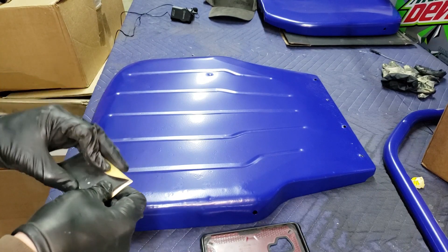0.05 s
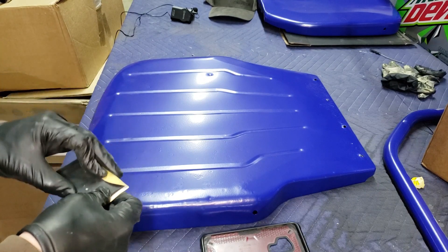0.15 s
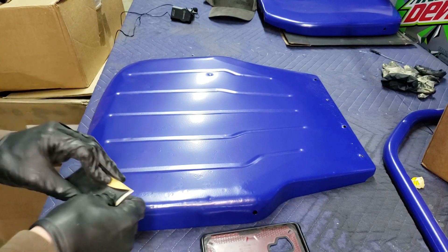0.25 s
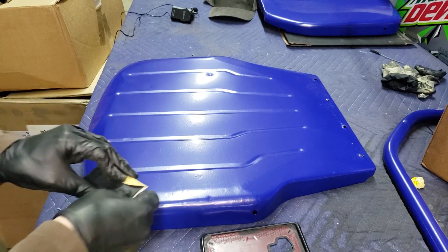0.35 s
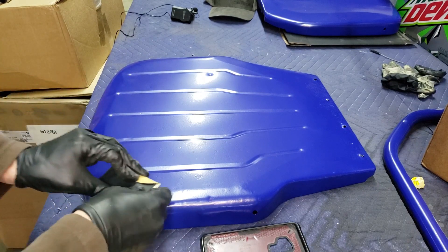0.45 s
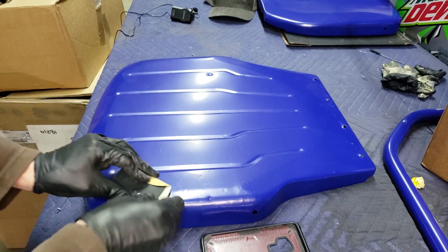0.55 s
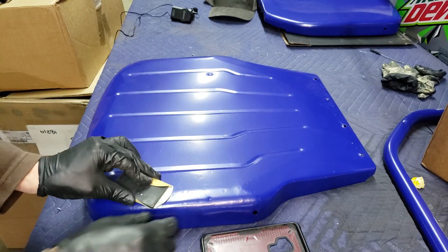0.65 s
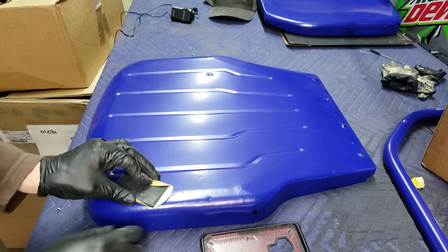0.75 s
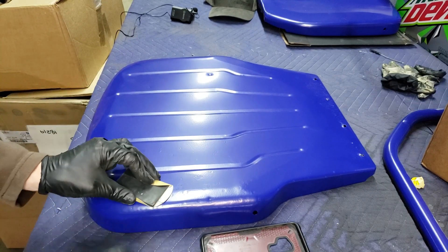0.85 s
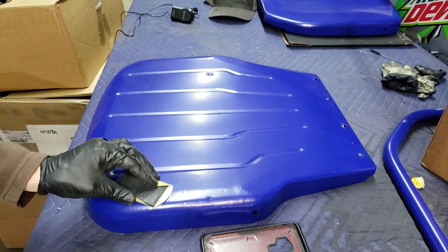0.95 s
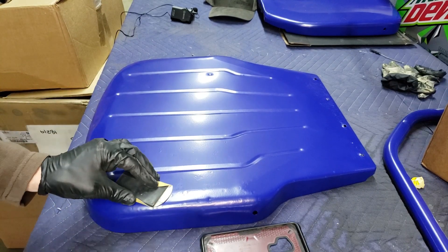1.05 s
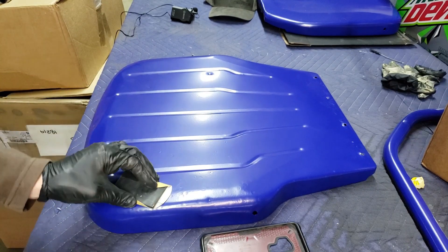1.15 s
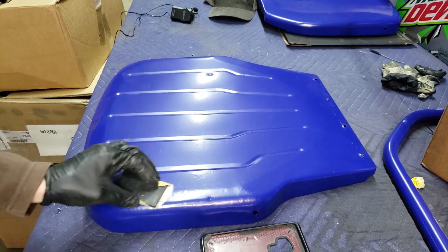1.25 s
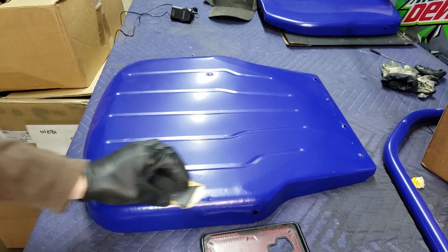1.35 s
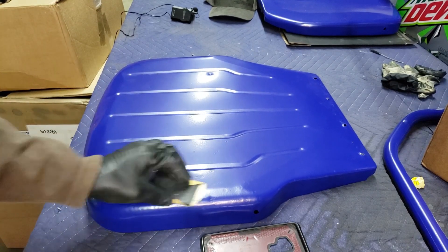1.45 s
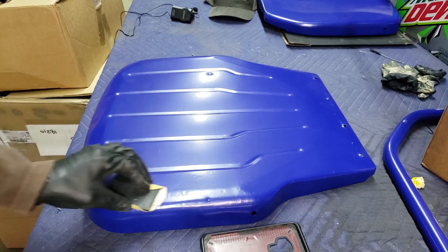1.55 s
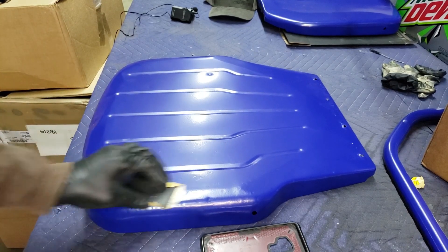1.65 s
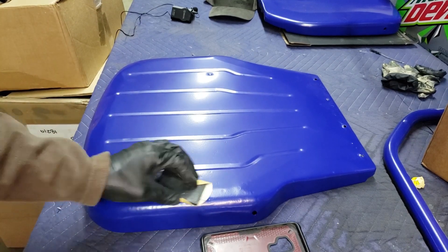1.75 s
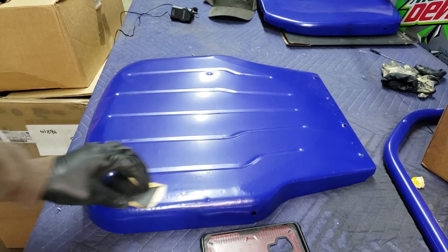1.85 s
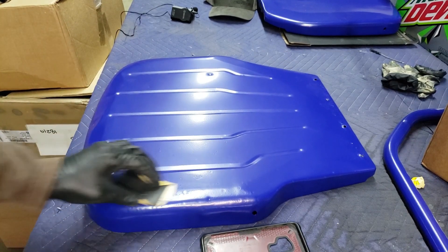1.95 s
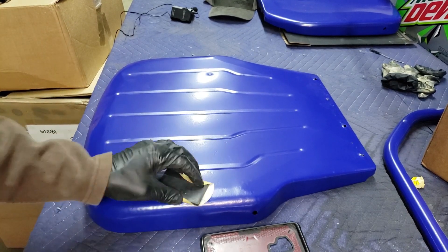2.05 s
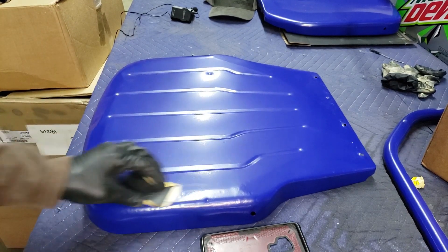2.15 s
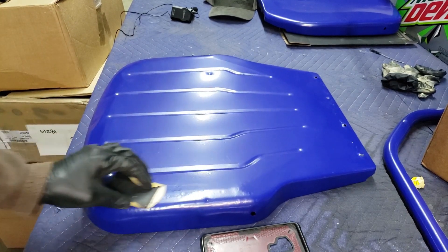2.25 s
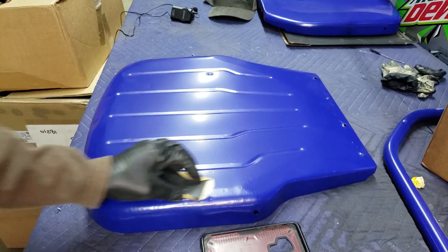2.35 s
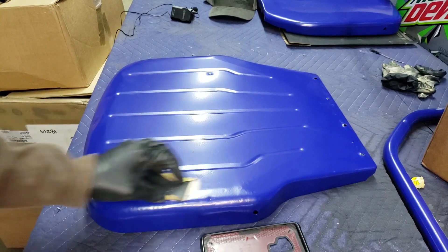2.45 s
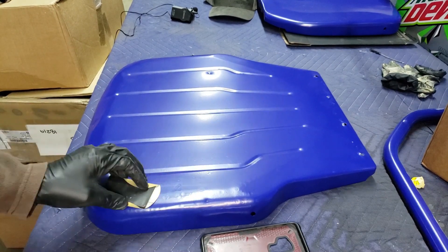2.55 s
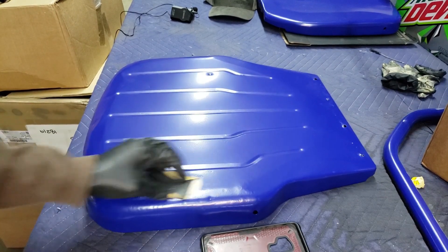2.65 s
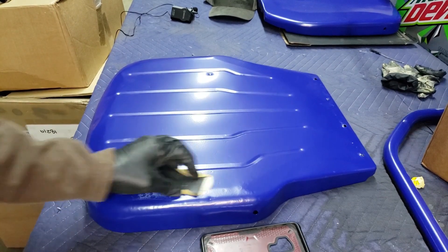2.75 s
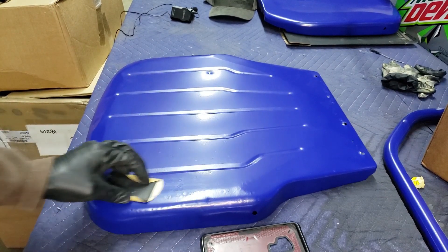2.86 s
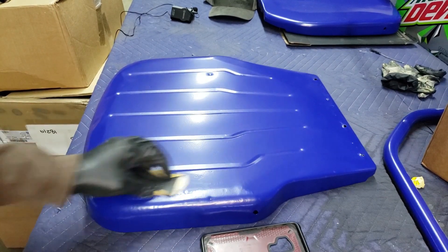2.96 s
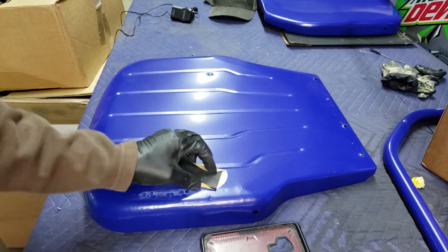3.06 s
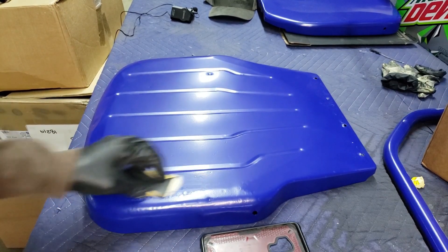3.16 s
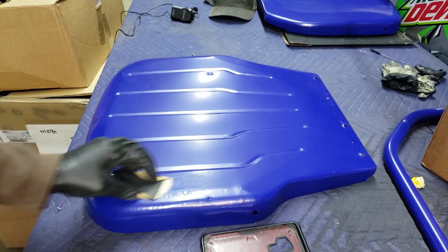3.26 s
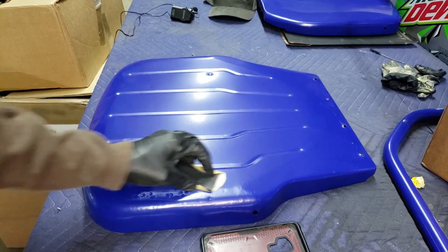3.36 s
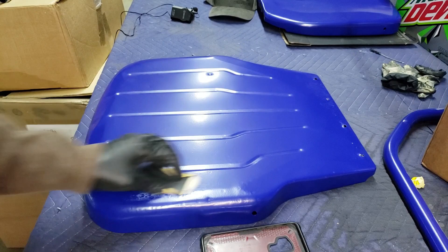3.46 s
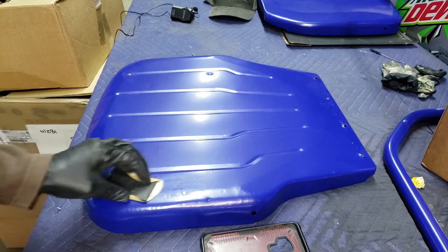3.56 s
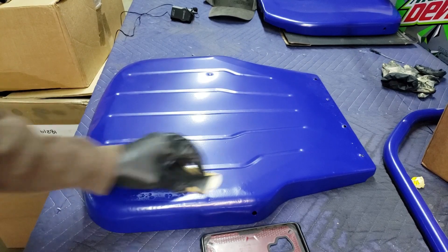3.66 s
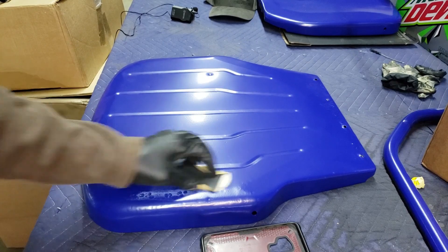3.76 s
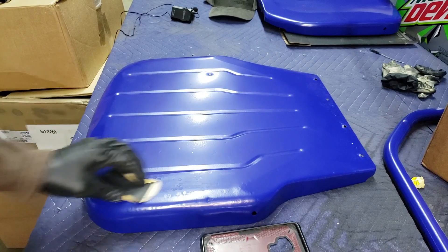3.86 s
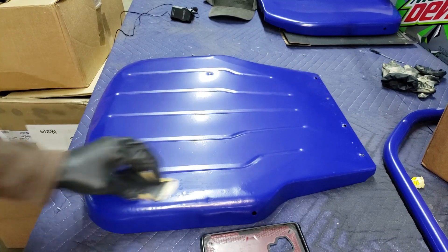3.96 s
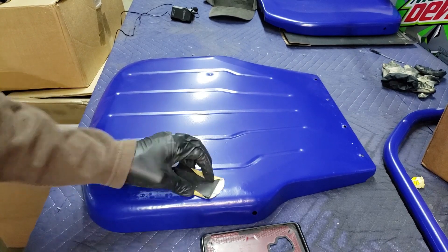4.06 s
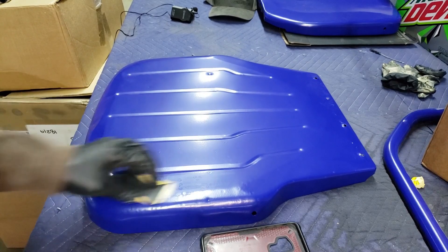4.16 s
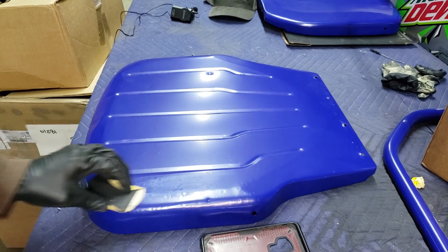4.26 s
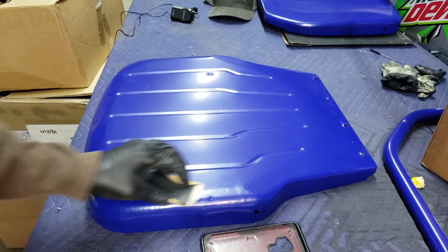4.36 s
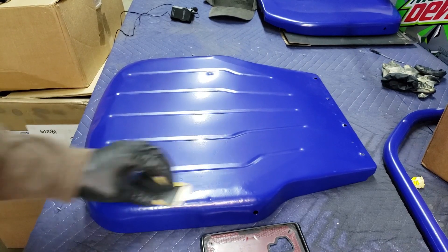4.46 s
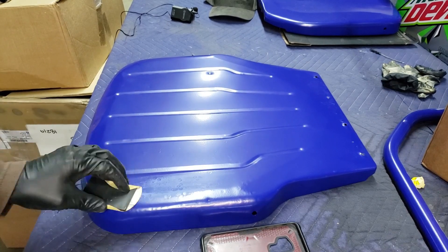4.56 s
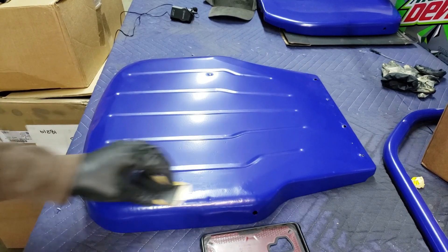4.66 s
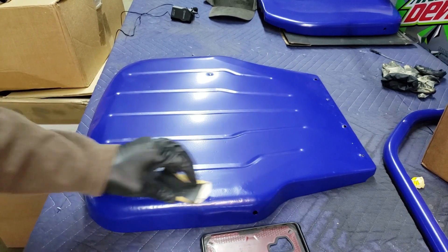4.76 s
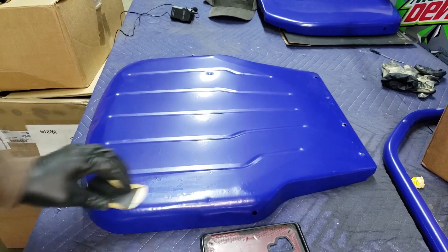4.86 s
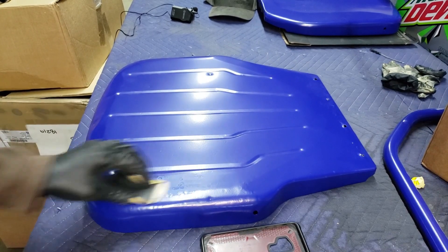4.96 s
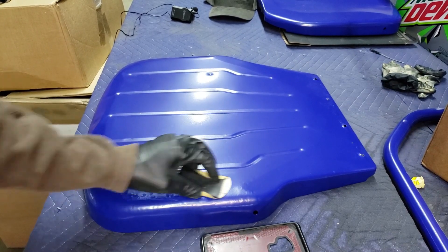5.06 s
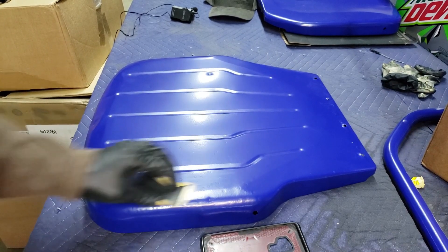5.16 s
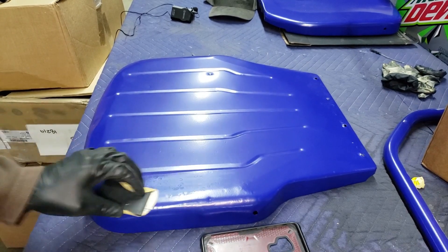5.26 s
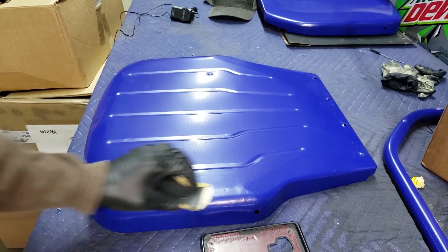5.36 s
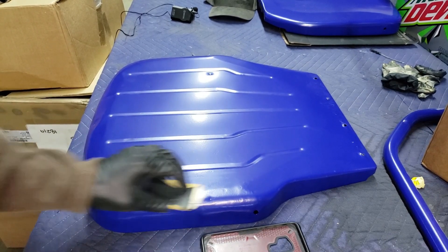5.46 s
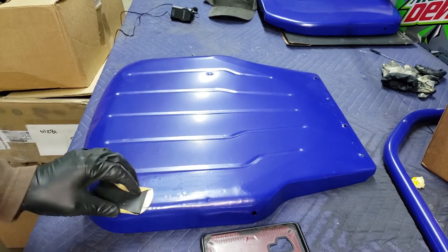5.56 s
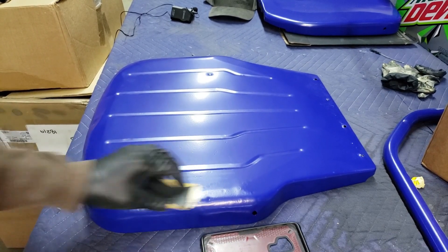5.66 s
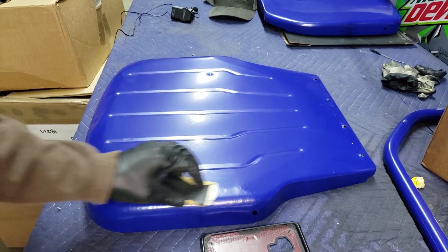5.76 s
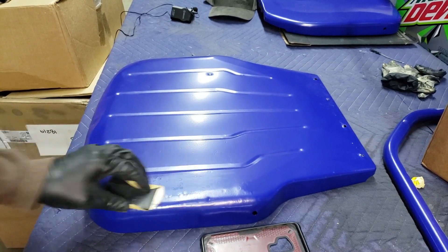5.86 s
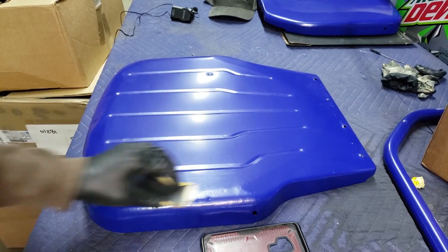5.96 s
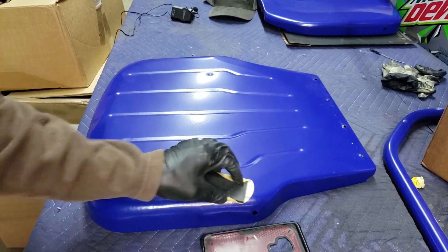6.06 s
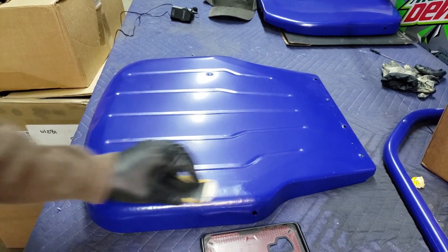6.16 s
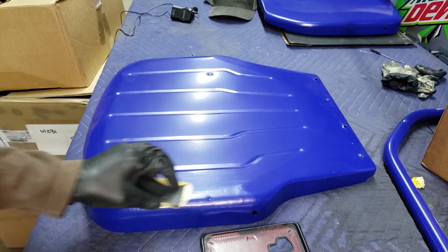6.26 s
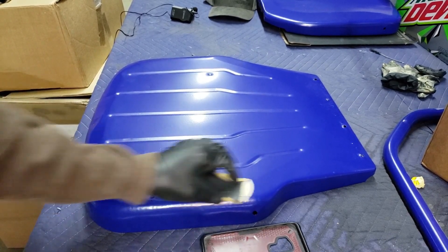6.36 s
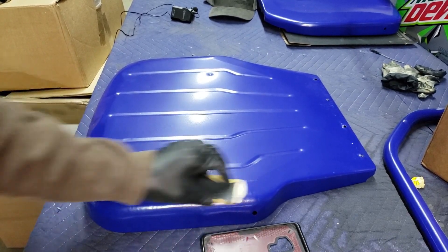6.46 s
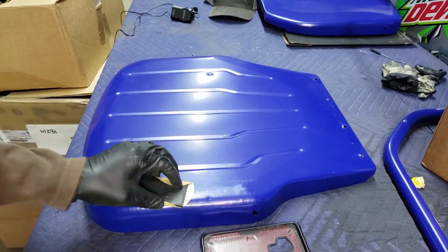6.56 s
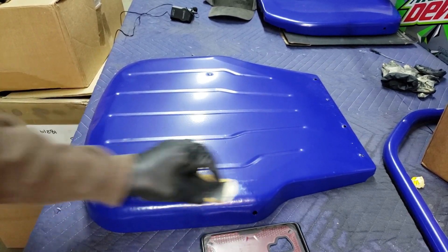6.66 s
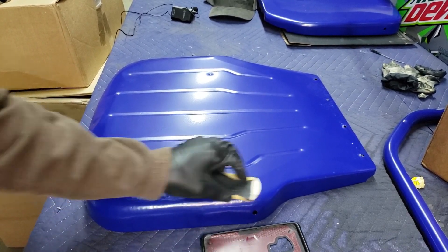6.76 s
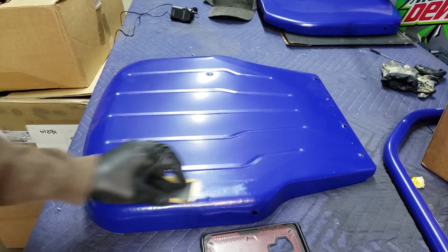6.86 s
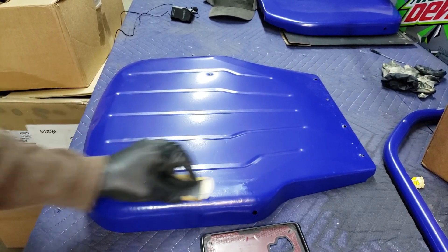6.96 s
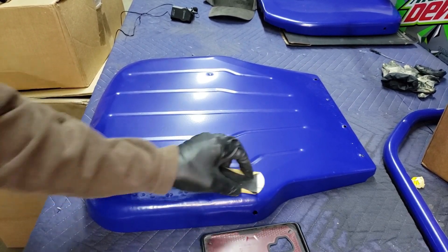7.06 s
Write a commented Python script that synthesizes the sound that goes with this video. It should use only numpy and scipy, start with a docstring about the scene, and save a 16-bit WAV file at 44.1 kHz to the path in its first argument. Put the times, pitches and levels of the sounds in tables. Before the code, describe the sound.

A gloved hand settles a sanding pad on a coated steel panel with soft brushes and a few crackles of stiff paper. Then it sands quickly back and forth in even, hissing, scratchy strokes, the paper sometimes catching with a rasp and the metal ringing faintly. The work sounds close, in a small workshop with a low machine hum. A hollow drone swells in the background near the end.

```python
"""Machinery hums in a small workshop as a gloved hand settles a hard sanding pad on a coated steel panel:
soft brushes, a few crackles of stiff paper. From 1.3 s it rubs to and fro, six strokes a second.
Grit scratches faster as the pad speeds up and falls silent at each turn; the panel rings faintly under it
and on some strokes the paper catches and rasps. From about 5.5 s a hollow drone swells behind the work."""
import sys
import numpy as np
from scipy import signal
from scipy.fft import rfft, irfft, next_fast_len
from scipy.io import wavfile
from scipy.ndimage import uniform_filter1d

SR = 44100
rng = np.random.default_rng(int(sys.argv[2]) if len(sys.argv) > 2 else 0)


def unload_audio(sound):
    """Save the sound as a 16-bit wav file, at the path given as the first command line argument."""
    columns = np.transpose(np.atleast_2d(sound))
    # keep every value between -1 and 1, then stretch to whole-number steps
    steps = np.round(np.clip(columns, -1, 1) * 32767)
    wavfile.write(sys.argv[1], SR, steps.astype(np.int16))


N = 313110
PADDED = next_fast_len(N + SR // 4, True)
TIME, FREQS = np.arange(N) / SR, np.fft.rfftfreq(PADDED, d=1 / SR)


# EQ of grit scraping on steel: f/Hz, left level/dB, right level/dB
SCRAPE_EQ = [(200, -13, -14), (450, -11, -16), (900, -22, -23), (1600, -20, -22), (3000, -13, -14),
             (4000, -12, -13), (6400, -6, -5), (7400, -5, -8), (8400, -13, -22), (10500, -8, -13),
             (11800, -3.7, -7), (13400, -4, -7.5), (14800, -2, -14.5), (15600, 0, -15)]
def sanding(fine_db=3.0, coarse_db=-3.0, crossover_hz=7900):
    """Fine grit hisses on top, coarse grit bites below and rings the panel; both get denser with speed."""
    speed, place, pressure, bite, ringing = hand()
    fine = grit(14000 * (speed + .3), spread_db=2.5, grain_s=.0005)
    fine *= (speed + .33) ** .18 * undb(.8 * walk(60.4)) * pressure
    coarse = grit(7000 * (speed + .3), spread_db=2.4, grain_s=.0007)
    coarse *= (speed + .063) ** .024 * undb(.57 * walk(42.8)) * pressure * bite
    coarse = stereo(coarse, alike_hz=716, lag_s=.00016)
    left_eq = colour([(hz, left) for hz, left, _ in SCRAPE_EQ])
    right_eq = colour([(hz, right) for hz, _, right in SCRAPE_EQ])
    eq = np.array([left_eq, right_eq])
    treble = 1 / (1 + (crossover_hz / (FREQS + 1)) ** 16)
    hiss = undb(fine_db) * shape(fine, unit(eq * np.sqrt(treble)))
    scratch = undb(coarse_db) * shape(paper_flex(coarse), unit(eq * np.sqrt(1 - treble)))
    return close_reflections(hiss + scratch + paper_catches(), place) + panel(coarse * ringing)


# how far the hand drags behind its beat: t/s, lag/s
BEAT_LAG = [(1.32, -0.0029), (1.65, 0.019), (1.82, 0.0015), (2.15, -0.0091), (3.31, -0.014), (3.65, -.022),
            (3.98, -0.0035), (4.31, 0.00072), (4.97, -0.00049), (5.3, 0.016), (5.64, 0.0029),
            (5.97, -0.0021), (6.14, 0.011), (7.1, .012)]
# arm effort, the fader ride on all the grit: t/s, level/dB
ARM_EFFORT = [(1.32, -37.5), (1.7, -33.8), (2.6, -33.6), (3.2, -35.5), (3.75, -35), (4.2, -33), (4.6, -34),
              (5.15, -33), (5.38, -36.5), (5.55, -35), (6.05, -34), (6.55, -35), (7, -33)]
# extra ride on the coarse grit: t/s, level/dB
GRIT_BITE = [(1.32, -4.5), (2.6, -3.5), (3.05, -4.2), (3.45, -2.4), (4.35, -5), (5.1, -5.2), (5.6, -2.6),
             (6.1, -4.8), (7.1, -4.5)]
# send to the panel, which rings less near its stiff rim: t/s, level/dB
PANEL_SEND = [(4.9, -2), (5.9, -11), (7.1, -8)]
def hand(first_s=1.324, stroke_s=.166, break_s=.00073, halt_s=.016):
    """The hand pushes and pulls to an even beat, and the pad sticks briefly at each turn."""
    # pressure rise over the stroke/dB, extra bite/dB, extra ring/dB, rest at the turn/s
    push = (.17, .79, 0, .012)  # holds its pressure and bites harder
    pull = (-2, -.3, -3, .015)  # starts hard and eases off
    beats = np.arange(first_s, TIME[-1] + 2 * stroke_s, stroke_s)
    starts = beats + curve(BEAT_LAG, beats)
    stroke = np.maximum(np.searchsorted(starts, TIME) - 1, 0)
    lean_db, bite_db, ring_db, rest_s = np.array([push, pull])[stroke % 2].T
    since, until = TIME - starts[stroke], starts[stroke + 1] - rest_s - TIME
    swing = np.pi * np.clip(since / (since + until), 0, 1)
    speed, place = np.sin(swing), np.cos(swing) * (-1) ** stroke
    # the grit breaks free abruptly and comes to rest more gently
    sliding = (1 - np.exp(-since.clip(0) / break_s)) * (1 - np.exp(-(until.clip(0) / halt_s) ** 2))
    pressure = sliding * undb(curve(ARM_EFFORT, TIME) - lean_db / 2 * np.cos(swing))
    bite = undb(curve(GRIT_BITE, TIME) + bite_db)
    ringing = undb(curve(PANEL_SEND, TIME) + ring_db)
    return speed, place, pressure, bite, ringing


def grit(rate, spread_db, grain_s):
    """Grains catch and let go, rate times a second: tiny bursts, most weak and a few strong."""
    hits = rng.random(N) < rate / SR
    strength = undb(spread_db * np.minimum(rng.exponential(size=N), 6))
    energy = signal.lfilter([1], [1, -np.exp(-1 / (grain_s * SR))], hits * strength ** 2)
    return unit(noise() * np.sqrt(energy))


def paper_flex(x, depth=.37, rate=7):
    """The paper flexes under the fingers, so narrow bands of its colour come and go."""
    return x + sum(depth * walk(rate) * band(x, hz, hz / 7) for hz in np.geomspace(1800, 7000, 8))


# rasp accents: t/s, level/dB
RASPS = [(1.756, -41), (1.896, -36), (2.197, -37.5), (2.555, -45), (2.85, -42), (4.052, -38), (4.207, -35),
         (4.537, -36.5), (4.867, -34), (5.223, -36.5)]
def paper_catches(hz=6360, width_hz=2200, fade_s=.015):
    """The paper catches and chatters brightly near the middle of some strokes."""
    chatter = grit(1600, spread_db=3.0, grain_s=.00072)
    envelope = sum(undb(db) * swell(s, fade_s, fade_s) for s, db in RASPS)
    return envelope * rasp(chatter, hz, width_hz)


# modes of the steel panel: f/Hz, width/Hz, level/dB
PANEL_MODES = [(232, 25, 7), (1137, 16, -4), (1250, 30, -4), (1462, 45, -5), (1783, 22, 0), (1995, 60, -5),
               (2188, 24, 1), (2318, 18, -3), (3033, 26, 2)]
def panel(drive, patchy_db=3):
    """The steel rings under the grit; each mode swells and fades at random, as if the pad crossed nodes."""
    return sum(band(drive, hz, width) * undb(db + patchy_db * walk(4.6)) for hz, width, db in PANEL_MODES)


def close_reflections(pair, place, gain=.25, sweep_s=.0003):
    """Bounces off hand, panel and bench; their paths change as the pad travels, a light flange."""
    out, index = pair.copy(), np.arange(N)
    for channel, delay_s in [(0, .0016), (0, .0037), (1, .0011), (1, .0046)]:
        out[channel] += gain * np.interp(index - (delay_s + sweep_s * place) * SR, index, pair[channel])
    return out


# settling touches: peak t/s, rise/s, fall/s, rub level/dB, scuff f/Hz, scuff level/dB
TOUCHES = [(.1, 0.032, 0.02, -56, 4730, -62), (.236, 0.0084, 0.011, -55, 2700, -63),
           (.607, 0.032, 0.014, -49, 3430, -59), (.662, 0.0094, 0.013, -45.5, 2480, -59),
           (.77, 0.13, 0.19, -58.5, 1700, -70), (1.055, 0.029, 0.068, -53, 2700, -58.5),
           (1.224, 0.026, 0.04, -49.5, 6000, -63)]
# EQ of the rub: f/Hz, level/dB
RUB_EQ = [(500, 1.5), (1500, -9.5), (3200, -8), (5000, -7), (7200, -5), (8500, -15.5), (12000, -14.5),
          (16000, -10.5)]
def glove_brushes(relative_width=.46):
    """Glove and paper brush over the panel: a broad rub, and a scuff with its own pitch each time."""
    rub = shape(grit(2500, spread_db=2, grain_s=.0008), unit(colour(RUB_EQ)))
    scuff = grit(2300, spread_db=2, grain_s=.00085)
    out = 0
    for s, rise, fall, rub_db, hz, scuff_db in TOUCHES:
        touch = undb(rub_db) * rub + undb(scuff_db) * rasp(scuff, hz, relative_width * hz)
        out += swell(s, rise, fall) * touch
    return out


# snaps of the paper: t/s, level/dB before the trim
SNAPS = [(0.657, -34), (0.7636, -45), (0.7744, -43), (0.789, -43), (0.8127, -34), (0.848, -38),
         (0.8978, -45), (1.005, -34), (1.0127, -34)]
# EQ of a snap: f/Hz, level/dB
SNAP_EQ = [(500, -16), (2500, -12), (5000, -5), (6800, 4.5), (8500, -8), (13000, -4), (16000, -9)]
def paper_crackles(trim_db=-6, decay_s=.0028):
    """The stiff paper crackles as it is gripped: noise bursts with a hard attack and a tight tail."""
    envelope = 0
    for s, db in SNAPS:
        decay = np.exp(-np.minimum(np.abs(TIME - s) / decay_s, 20))
        envelope += undb(db + trim_db) * (TIME >= s) * decay
    return shape(noise() * envelope, unit(colour(SNAP_EQ)))


def room_reverb(x, t60_s=.6):
    """The shop walls return a short, dense, duller tail that differs left and right."""
    t = TIME[:SR // 2]
    tail = rng.standard_normal((2, len(t))) * np.exp(-np.log(1000) * t / t60_s)
    tail /= np.sqrt(np.sum(tail ** 2, axis=1, keepdims=True))
    walls = colour([(300, 4), (2000, 10.5), (6000, 2.5), (10000, -5.5), (16000, -4)])
    return shape(signal.fftconvolve(x, tail, axes=1)[:, :N], walls)


# machine tones: f/Hz, level/dB, waver/dB
HUM_TONES = [(41.5, -58.5, 2.5), (83.2, -52, 1.8), (114.4, -59.5, 2.5), (146.3, -50, -0.27),
             (173.9, -62, 1.5), (226.6, -64, 3)]
def machine_hum(drift_rad_per_db=.63):
    """Machinery hums just right of centre, each tone wavering in level and phase."""
    hum = 0
    for hz, db, waver_db in HUM_TONES:
        amplitude = np.sqrt(2) * undb(db + waver_db * walk(4.2))
        drift = drift_rad_per_db * waver_db * walk(2.3)
        hum += amplitude * np.sin(2 * np.pi * hz * TIME + drift)
    return pan(hum, left_db=-.7)


# EQ of the room tone: f/Hz, level/dB
AIR_EQ = [(15, -47), (25, -34), (59, -3.5), (130, -1.5), (170, -14.5), (200, -11), (335, -9.5),
          (516, -13.5), (624, -19.5), (734, -18), (1040, -22.5), (3250, -36), (6740, -33.5), (8590, -43),
          (16000, -44)]
def shop_air(level_db=-49.5, waver_db=1.16):
    """Moving air lays a gently breathing bed of rumble, a little to the left."""
    air = unit(shape(stereo(noise(), alike_hz=680, lag_s=.00012), colour(AIR_EQ)))
    return pan(air * undb(level_db + waver_db * walk(3.1)), left_db=1.46)


# fade-in of the drone: t/s, level/dB
DRONE_FADE = [(5.1, -100), (5.5, -59), (5.72, -55.5), (5.9, -49.5), (6.2, -47.5), (7.1, -48.5)]
# its hollow resonances: f/Hz, width/Hz, level/dB
DRONE_MODES = [(430, 29, -8), (511, 47, 0), (710, 22, 2), (765, 18, -6), (823, 15, 0), (1010, 130, -16.5)]
def drone():
    """A hollow rush with a few narrow resonances swells in the background."""
    hollow = sum(undb(db) * 1j * FREQS * width / (hz ** 2 - FREQS ** 2 + 1j * FREQS * width)
                 for hz, width, db in DRONE_MODES)
    rush = unit(shape(stereo(noise(), alike_hz=910, lag_s=.00013), hollow))
    return rush * undb(curve(DRONE_FADE, TIME))


def undb(db):
    """Decibels to gain."""
    return 10 ** (np.asarray(db) / 20)


def unit(x):
    """Scale to rms 1."""
    return x / np.sqrt(np.mean(x ** 2))


def noise():
    """Two unrelated white noises."""
    return rng.standard_normal((2, N))


def shape(x, gain):
    """Filter by a gain for every frequency."""
    return irfft(rfft(x, PADDED) * gain, PADDED)[..., :N]


def colour(points):
    """EQ curve through (f/Hz, level/dB) points on a log-frequency axis."""
    hz, db = np.transpose(points)
    return undb(np.interp(np.log(FREQS + 1), np.log(hz), db))


def band(x, hz, width):
    """One resonance, gain 1 at its centre."""
    return signal.lfilter(*signal.iirpeak(hz, hz / width, fs=SR), x)


def rasp(x, hz, width):
    """A resonance with steep skirts, at rms 1."""
    return unit(band(band(x, hz, width), hz, width))


def curve(points, t):
    """Read a (t/s, value) automation curve at times t."""
    return np.interp(t, *np.transpose(points))


def swell(s, rise, fall):
    """A bell-shaped envelope that peaks at time s."""
    return np.exp(-.5 * np.minimum(((TIME - s) / np.where(TIME < s, rise, fall)) ** 2, 40))


def walk(rate):
    """Smooth random modulation at rms 1 that changes about rate times a second."""
    hold = max(int(SR / rate / 2), 1)
    steps = np.repeat(rng.standard_normal(N)[:N // hold + 1], hold)[:N]
    return unit(uniform_filter1d(steps, hold))


def stereo(pair, alike_hz, lag_s):
    """Blend two unrelated signals: near mono in the bass, wide on top, a little later on the right."""
    apart = np.pi / 4 * FREQS / np.hypot(FREQS, alike_hz)
    mid, side = shape(pair[0], np.cos(apart)), shape(pair[1], np.sin(apart))
    return np.array([mid + side, shape(mid - side, np.exp(-2j * np.pi * FREQS * lag_s))])


def pan(x, left_db):
    """Raise the left side and lower the right by the same amount."""
    return x * undb([[left_db], [-left_db]])


def scene(reverb_db=-10):
    """The handwork up front, its reverb behind it, then hum, air and drone."""
    work = sanding() + glove_brushes() + paper_crackles()
    return work + undb(reverb_db) * room_reverb(work) + machine_hum() + shop_air() + drone()


def record(dry):
    """A steep high cut on the whole mix."""
    cutoff_hz = 15750
    return signal.sosfilt(signal.ellip(12, .1, 80, cutoff_hz, fs=SR, output="sos"), dry)


dry = scene()
out = record(dry)
unload_audio(out)
```